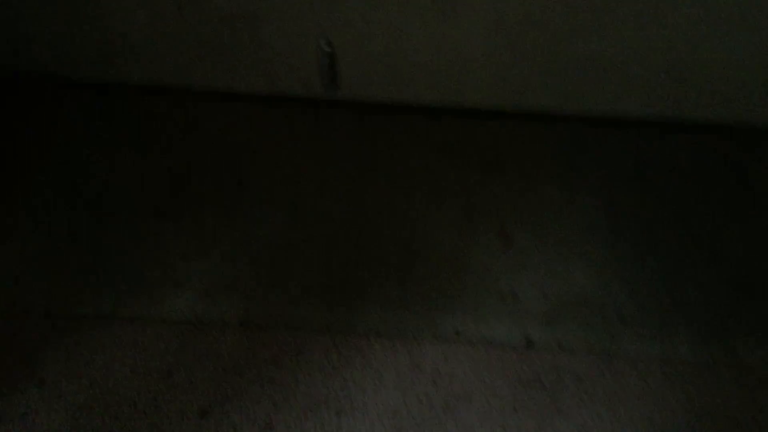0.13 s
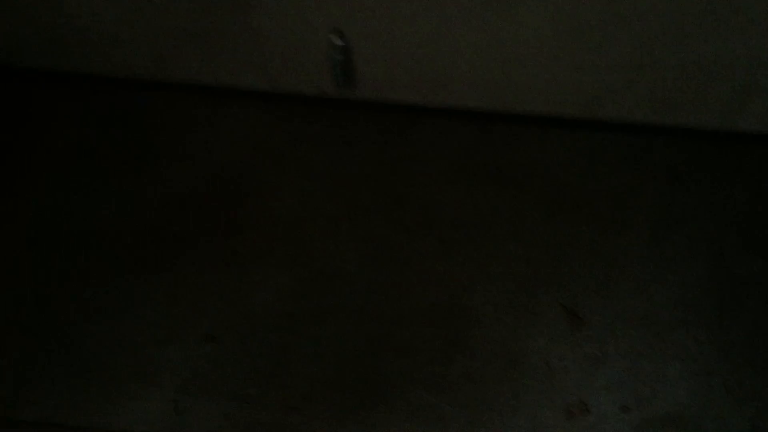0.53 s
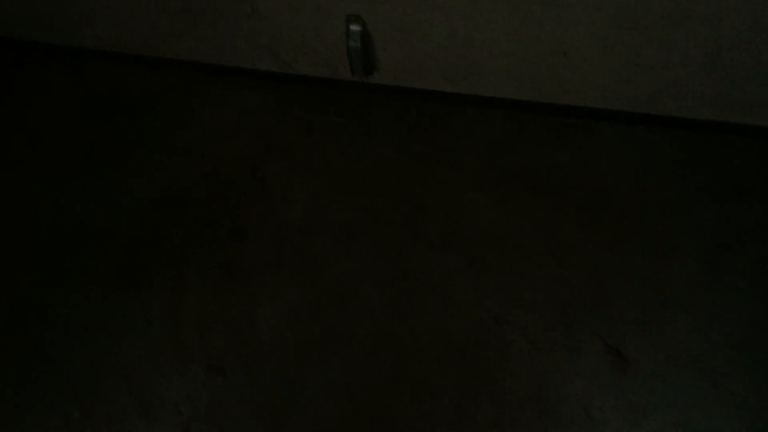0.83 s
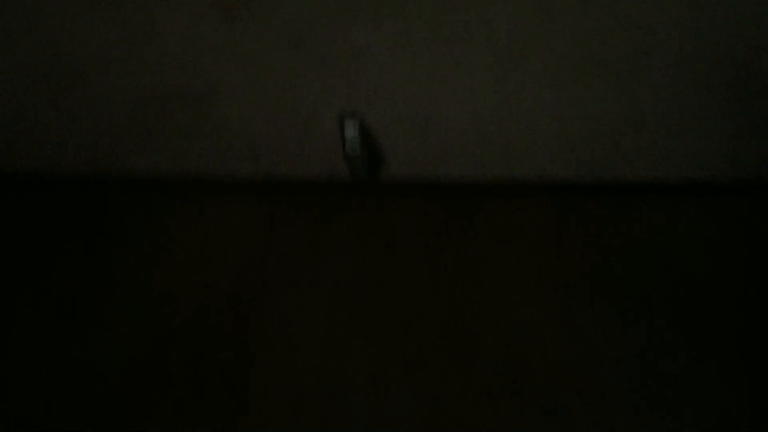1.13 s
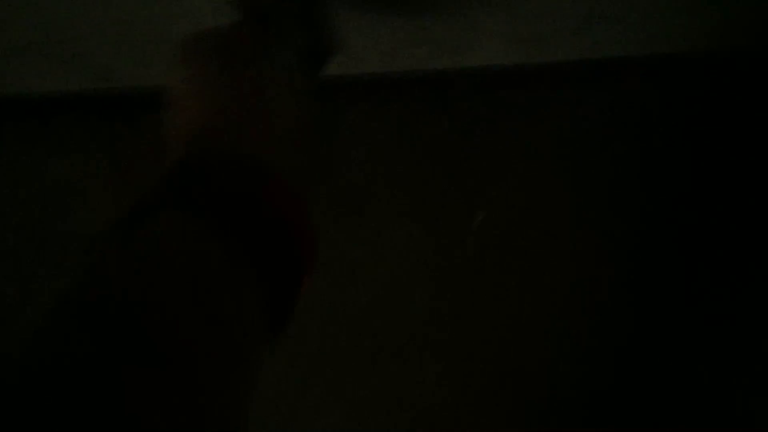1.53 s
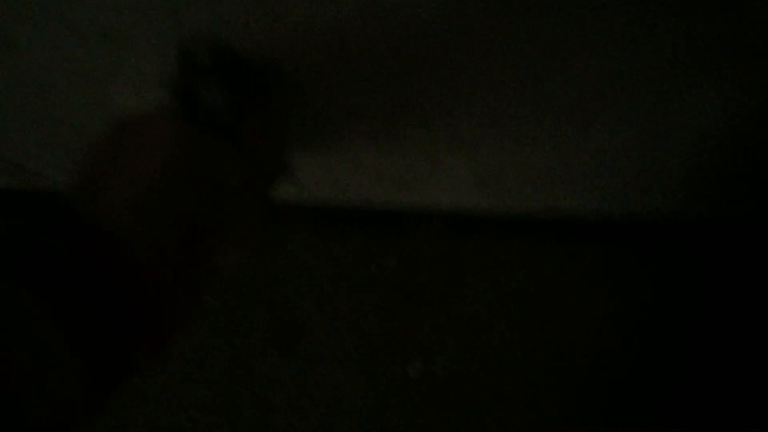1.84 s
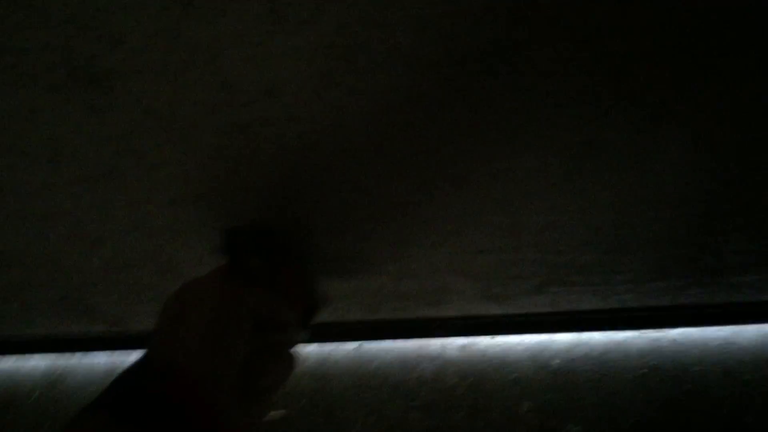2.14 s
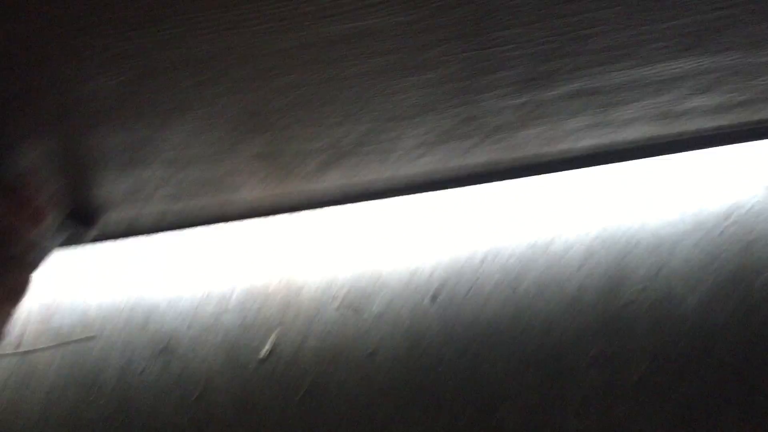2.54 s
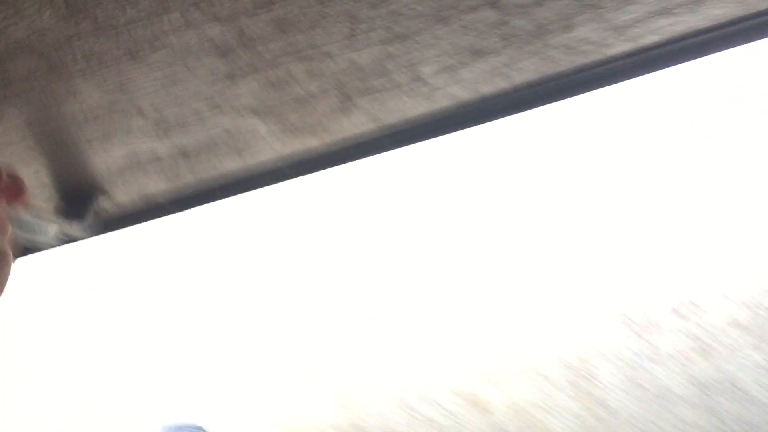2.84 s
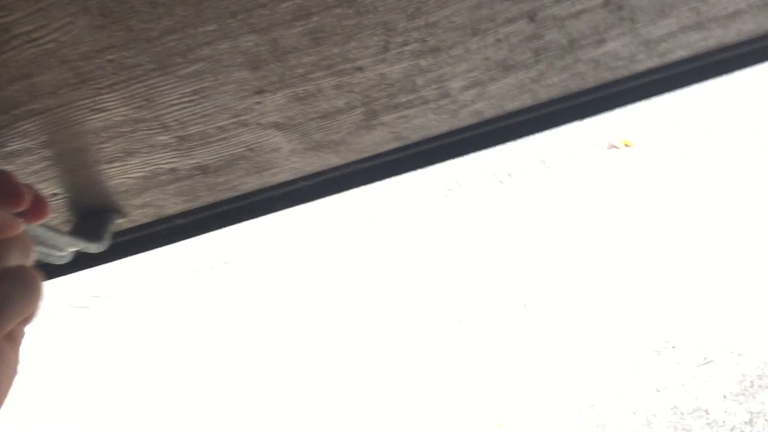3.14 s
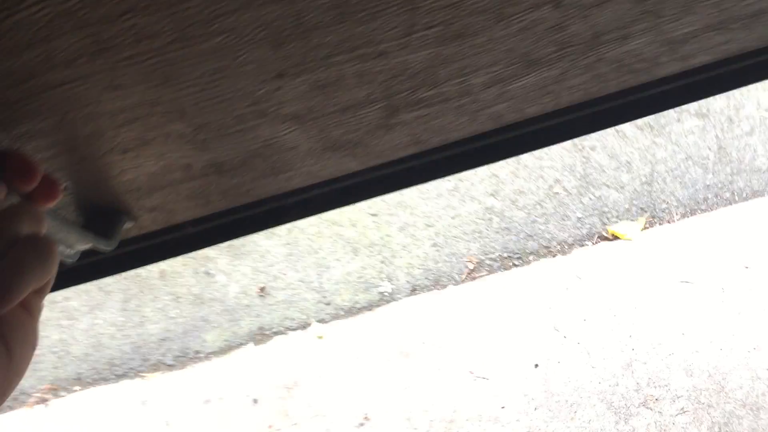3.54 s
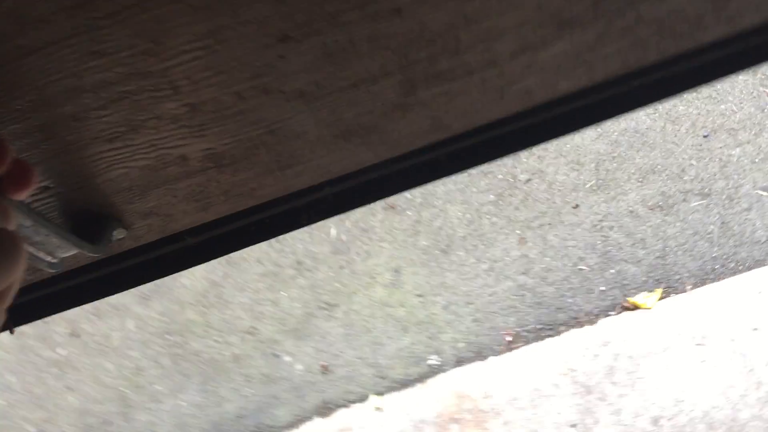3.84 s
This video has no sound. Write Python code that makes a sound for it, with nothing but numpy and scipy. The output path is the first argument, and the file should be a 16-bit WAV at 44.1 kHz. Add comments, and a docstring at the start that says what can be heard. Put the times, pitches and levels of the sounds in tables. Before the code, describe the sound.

A steel garage door is lifted by hand. After a few soft scuffing steps, the handle clicks, a roller scrapes and the door bangs free, then rumbles and rattles upward, heard close up inside a bare garage.

```python
"""Someone steps up to a steel garage door from inside, shoes scuffing on concrete, and grabs the handle.
The handle clicks and the door jolts. A dry roller scrapes and squeaks, then the door bangs free.
As it is hauled up, its rollers rumble along the tracks, loose hinges rattle and the panels boom.
The bare garage adds a short echo to the steps, knocks and rattles."""
import sys
import numpy as np
from scipy import signal
from scipy.fft import rfft, irfft, next_fast_len
from scipy.io import wavfile
from scipy.ndimage import uniform_filter1d, map_coordinates

SR = 44100
rng = np.random.default_rng(int(sys.argv[2]) if len(sys.argv) > 2 else 0)


def file_out(sig):
    """Save sig as 16-bit WAV at sys.argv[1]."""
    # one column per channel
    cols = np.atleast_2d(sig).T
    # limit, then scale
    lim = np.clip(cols, -1, 1)
    pcm = np.round(lim * 32767).astype(np.int16)
    wavfile.write(sys.argv[1], SR, pcm)


N = 176400
T = np.arange(N) / SR
AGE = np.arange(SR // 2) / SR  # seconds since one short sound began

# the notes at which the steel tracks and hinges ring: f/Hz, width/Hz, level/dB
TRACK_MODES = [(716, 11, -8), (967, 30, -1.5), (1783, 30, -13), (2323, 35, 0.5), (2730, 66, -5),
               (3080, 11, 2), (3440, 33, -0.5), (4150, 16, 3), (4400, 32, -11.5), (5260, 45, -8),
               (5400, 24, -4), (6300, 15, -8), (9380, 66, -20.5)]


def rollers():
    """Rollers clatter over the rough tracks; the louder they roll, the more the tracks ring."""
    # loudness of the rolling: t/s, level/dB
    loudness = [(1.0, -71.5), (1.5, -51.5), (1.9, -63.5), (2.03, -45.5), (2.2, -40), (2.38, -39.5),
                (2.58, -37.5), (2.7, -32.5), (2.78, -40.5), (2.84, -33.5), (2.9, -26), (3.1, -28.5),
                (3.3, -29.5), (3.39, -28.5), (3.5, -27.5), (3.65, -30), (3.8, -27.5), (4.0, -26.5)]
    # its tone colour: f/Hz, level/dB
    spectrum = [(120, -17), (250, 3.5), (340, 0.5), (430, -2.5), (580, 3.5), (1050, -0.5), (1400, -0.5),
                (2000, -3), (2500, -2.5), (3300, -10), (4800, -15.5), (6500, -19), (7700, -22.5),
                (9000, -26.5), (12000, -43), (17500, -54)]
    level_db = curve(loudness) + 0.59 * wobble(35)
    bumps = contacts(N, rate=400, spread_db=2.5)
    clatter = coloured(shimmer(sheet(bumps, t60=0.043)), spectrum)
    ringing = resonate(coloured(noise(N), spectrum), TRACK_MODES)
    ringing_db = -10 + 0.85 * (level_db - level_db.max())
    return amp(level_db) * (clatter + amp(ringing_db) * ringing)


def panels():
    """The shaken door booms at its lowest notes over a broad rumble."""
    # loudness of the boom: t/s, level/dB
    loudness = [(.08, -61), (.5, -64.5), (.8, -55), (1.03, -65.5), (1.35, -57), (1.55, -52.5),
                (1.75, -40.5), (1.83, -63), (1.93, -44.5), (2.0, -38.5), (2.2, -42.5), (2.3, -30),
                (2.45, -41.5), (2.8, -36), (2.92, -29.5), (3.28, -26.5), (3.42, -28.5), (3.65, -31.5),
                (4.0, -27)]
    # tone colour of the rumble: f/Hz, level/dB
    spectrum = [(15, -70), (27, -44), (42, -3.5), (62, 2), (90, 0.5), (125, -0.5), (190, -6.5), (250, -12),
                (400, -16.5), (880, -43)]
    # the panels' notes: f/Hz, width/Hz, level/dB
    modes = [(95.1, 3.9, 1), (193.8, 14.6, -8), (334, 22, -20)]
    level_db = curve(loudness) + 1.1 * wobble(10)
    rumble = amp(-3) * coloured(noise(N), spectrum)
    boom = amp(-2) * resonate(noise(N), modes)
    return amp(level_db) * (rumble + boom)


def rattles():
    """Loose hinges chatter in bursts and make the tracks ring."""
    # rattles: t/s, level/dB, rise/s, fade/s, treble tilt/(dB per octave), ringing offset/dB
    shakes = [(2.237, -30, 0.015, 0.22, -2, -25), (2.268, -18.5, 0.0055, 0.13, -1, -2),
              (2.296, -21, 0.0057, 0.12, -2.5, 2), (2.798, -34, 0.02, 0.19, 9, -11),
              (2.837, -21, 0.0028, 0.38, 3, 0), (2.901, -14, 0.0025, 0.088, 1.5, 12),
              (2.937, -20.5, 0.0026, 0.21, 9.5, -6), (2.976, -19, 0.0026, 0.17, -0.5, 6),
              (3.044, -19.5, 0.0055, 0.27, 0.5, -7), (3.158, -24, 0.0056, 0.32, -1, -10),
              (3.221, -25, 0.0044, 0.28, -1, -5.5), (3.29, -27.5, 0.019, 0.21, -3, 3),
              (3.333, -22, 0.0052, 0.079, 1, -2), (3.419, -27, 0.0035, 0.043, 0, 2),
              (3.451, -19, 0.0027, 0.14, -2, 3.5), (3.526, -23.5, 0.0044, 0.1, 3, 2.5),
              (3.702, -19, 0.0035, 0.19, -1, 2), (3.722, -21, 0.0054, 0.17, -0.5, -3),
              (3.79, -32.5, .003, .06, 3.5, -4), (3.922, -31.5, 0.005, 0.33, 2, -12),
              (3.98, -26.5, 0.005, .15, -0.5, -13)]
    # tone colour of a hinge: f/Hz, level/dB
    spectrum = [(100, -9), (350, -6.5), (700, -10.5), (1100, -4), (1900, 0.5), (2800, -1), (4200, -4.5),
                (6700, -10.5), (7800, -17), (9400, -15), (10500, -23.5), (12000, -19), (17000, -38.5)]
    out = np.zeros(N)
    for s, db, rise, t60, tilt_db, ring_db in shakes:
        hits = contacts(len(AGE), rate=1600, spread_db=4.5)
        chatter = coloured(shimmer(sheet(hits, t60=0.011)), spectrum, tilt_db)
        ringing = amp(ring_db - 3.5) * resonate(chatter, TRACK_MODES)
        add(out, s, amp(db) * burst(rise, t60) * unit(chatter + ringing))
    return out


def thumps():
    """Low thuds of footfalls and of the flexing door: each is a wavering tone that dies away."""
    # thuds: t/s, level/dB, f/Hz, fade/s
    thuds = [(.235, -43.5, 183.7, 0.16), (.69, -54, 210, 0.36), (.89, -46, 89.8, 1),
             (1.406, -31, 209, 0.24), (1.414, -34, 328, 0.13), (1.406, -38, 70, 0.18),
             (1.649, -17, 71.8, 0.16), (1.651, -26, 193, 0.12), (1.653, -30, 358, 0.061),
             (1.866, -30.5, 78.5, 0.14), (1.98, -23.5, 476, 0.11), (1.98, -26, 640, 0.18),
             (1.985, -26.5, 122.5, 0.2), (1.982, -28, 215, 0.14), (2.25, -24, 67.8, 0.23),
             (2.671, -5.5, 196.4, 0.043), (2.671, -11, 338, 0.034), (2.67, -18.5, 87, 0.079),
             (2.882, -6.5, 124, 0.11), (2.89, -9.5, 238, 0.038), (2.892, -12.5, 67.5, 0.13),
             (3.715, -19, 91.8, 0.39), (3.932, -24, 58.5, 0.26)]
    out = np.zeros(N)
    for s, db, hz, t60 in thuds:
        pitch = hz * (1 + 0.099 * wobble(125)[:len(AGE)])
        add(out, s, amp(db) * burst(0.0036, t60) * sine(pitch))
    return signal.sosfilt(signal.butter(2, 38, "high", fs=SR, output="sos"), out)


def bang():
    """The door comes free with one hard, brief blow of steel on steel."""
    # notes of the struck steel: f/Hz, width/Hz, level/dB
    modes = [(984, 94, -1.5), (1830, 110, 1.5), (2400, 140, -5.5), (2640, 130, -3.5), (3360, 250, -1.5),
             (5700, 1000, -15)]
    # loss of treble in the blow: f/Hz, gain/dB
    dulling = [(3600, 6.5), (4500, -10), (17000, -5)]
    shape = burst(rise=0.00016, t60=0.009, hold=0.0038)
    steel = coloured(resonate(noise(), modes), dulling)
    out = np.zeros(N)
    add(out, 2.6678, amp(-5) * shaped(steel, shape))
    return out


def scrape():
    """A dry roller sticks and slips in a dense rasp, with a thin squeak that rises and falls."""
    # loudness of the rasp: t/s, level/dB
    loudness = [(2.405, -55), (2.411, -28), (2.432, -33.5), (2.47, -35), (2.52, -26), (2.565, -31),
                (2.592, -30.5), (2.612, -57), (2.632, -35), (2.665, -43)]
    # notes that the slips set ringing: f/Hz, width/Hz, level/dB
    modes = [(300, 31, 2), (1157, 110, 1.5), (1455, 140, -2.5), (1830, 150, -3), (2320, 100, -3.5),
             (2650, 66, -3.5), (2850, 110, -5.5), (3134, 110, -2), (4610, 90, -17), (7800, 300, -26),
             (8770, 300, -25), (9900, 300, -28)]
    slip_hz = 291.5 * (1 + 0.25 * wobble(200))
    slip_count = np.floor(np.cumsum(slip_hz) / SR)
    slips = np.diff(slip_count, prepend=0) * amp(4.5 * wobble(300))  # one uneven kick per slip
    friction = unit(slips) + 0.58 * noise(N)
    out = amp(curve(loudness, outside=-np.inf)) * resonate(friction, modes)

    start, end = 2.412, 2.557  # the squeak, in seconds
    arch = np.sin(np.pi * np.minimum(AGE / (end - start), 1))
    pitch = 5480 + 170 * arch + 165 * wobble(900)[:len(AGE)]
    flutter = amp(4.2 * wobble(247)[:len(AGE)])
    shape = burst(rise=0.031, t60=0.11, hold=end - start - 0.028)
    add(out, start, amp(-42) * shape * unit(flutter * sine(pitch)))
    return out


def pings():
    """Small steel parts strike and ring, each at its own pitch."""
    # strikes: t/s, level/dB, f/Hz, fade/s
    strikes = [(1.596, -31.5, 1370, 0.05), (1.653, -34.5, 4660, 0.024), (2.668, -14, 1075, 0.021),
               (2.868, -21.5, 1036, 0.1), (3.052, -25, 2350, 0.072), (3.456, -25, 2100, .05),
               (3.706, -26, 2740, .07), (2.903, -10, 2890, 0.048), (2.904, -19, 6500, 0.059),
               (2.911, -17.5, 4900, 0.074), (2.977, -18, 3370, .09), (3.127, -42, 9300, .04),
               (3.222, -41, 11500, 0.027), (3.337, -33.5, 7900, .04), (3.338, -36, 15300, .04),
               (3.419, -35, 8800, 0.044), (3.453, -33, 13300, .06), (3.589, -39, 8400, 0.041),
               (3.642, -43, 8200, .06), (3.838, -38, 8000, .04), (3.984, -38, 13000, .05)]
    out = np.zeros(N)
    for s, db, hz, t60 in strikes:
        add(out, s, amp(db) * ring(hz, width=0.077 * hz, rise=0.00049, t60=t60))
    return out


def handle():
    """The latch and fittings click; the handle rings when knocked or rubbed."""
    # clicks: t/s, level/dB, fade/s, treble tilt/(dB per octave)
    clicks = [(1.537, -37, 0.03, 1.5), (1.597, -30, 0.026, 1.5), (1.654, -35, 0.016, 3),
              (1.674, -40, 0.031, 3.5), (1.826, -43.5, 0.022, 3), (1.928, -45.5, 0.11, 2),
              (1.9445, -32, 0.068, 0.5), (1.962, -33.5, 0.13, 5), (1.978, -21, 0.048, -4),
              (2.047, -37, 0.24, -1), (2.073, -35, 0.2, -2.5), (2.086, -24.5, 0.011, 11),
              (2.114, -34.5, 0.1, 2.5), (2.16, -35, 0.096, 1), (2.5478, -23, 0.012, 12.5),
              (2.657, -22.5, 0.14, 0.5), (2.668, -19, 0.011, 3), (2.8793, -16, 0.0058, -0.5),
              (2.884, -15.5, 0.02, 0.5), (2.8887, -12.5, 0.018, -2), (2.893, -14.5, .012, -2)]
    # tone colour of a click: f/Hz, level/dB
    spectrum = [(100, -16), (400, -8.5), (700, -1), (1500, 1), (2500, -2.5), (4400, -8), (6500, -13),
                (12000, -21.5), (17000, -36)]
    # knocks and rubs: t/s, level/dB, rise/s, fade/s, treble tilt/(dB per octave)
    taps = [(1.654, -30.5, 0.0012, 0.12, -3), (1.678, -45, .002, 0.13, 2), (1.737, -43.5, 0.017, 0.13, 1),
            (1.768, -50, .006, 0.12, 15), (1.851, -59, 0.02, 0.29, 8)]
    # the handle's notes: f/Hz, width/Hz, level/dB
    modes = [(630, 160, -13), (1060, 150, -11), (1605, 79, 1), (1750, 68, -1), (2520, 350, -15),
             (4440, 420, -11), (4660, 260, -12), (8750, 660, -30), (12400, 700, -33)]
    out = np.zeros(N)
    for s, db, t60, tilt_db in clicks:
        add(out, s, amp(db) * burst(0.00064, t60) * coloured(noise(), spectrum, tilt_db))
    for s, db, rise, t60, tilt_db in taps:
        tilted = [(hz, width, level + tilt_db * np.log2(hz)) for hz, width, level in modes]
        add(out, s, amp(db) * burst(rise, t60) * resonate(noise(), tilted))
    return out


def steps():
    """Grit grinds between sole and concrete; heels land and skid."""
    # scuffs: t/s, level/dB, rise/s, fade/s, treble tilt/(dB per octave)
    scuffs = [(.088, -59, 0.019, 0.47, 3.5), (.14, -53.5, 0.0088, 0.18, -10), (.235, -52, 0.012, 0.21, 3),
              (.551, -44, 0.0032, 0.2, 0), (.572, -41, 0.0076, 0.33, 1), (.684, -44.5, 0.0049, 0.16, -8.5),
              (.715, -50, 0.012, 0.24, -7), (.74, -58.5, 0.0065, 0.14, 9), (1.055, -38, 0.0009, 0.09, -1),
              (1.069, -35, 0.0016, 0.12, -0.5), (1.15, -44, 0.01, 0.16, 6), (1.249, -58.5, 0.038, 0.43, 3),
              (1.318, -50, 0.0071, 0.31, 0.5), (1.392, -36, 0.0027, 0.19, 2.5),
              (1.404, -21, 0.0018, 0.054, -0.3), (1.414, -16, 0.00058, 0.026, -2.5)]
    # tone colour of a scuff: f/Hz, level/dB
    spectrum = [(60, -16), (200, -2), (450, -5), (700, 0.5), (1000, 3.5), (1900, 2.5), (3500, -5.5),
                (6000, -13), (11000, -24.5), (17000, -37)]
    # heel strikes: t/s, level/dB, f/Hz, width/Hz, rise/s, fade/s
    heels = [(.553, -41, 1410, 600, 0.011, 0.23), (1.055, -45, 1240, 700, 0.0025, 0.27),
             (1.066, -39.5, 3400, 700, 0.0038, .05), (1.319, -49, 950, 400, .003, 0.19),
             (1.414, -21, 1880, 690, 0.00054, 0.042)]
    out = np.zeros(N)
    for s, db, rise, t60, tilt_db in scuffs:
        grit = contacts(len(AGE), rate=1200, spread_db=4)
        add(out, s, amp(db) * burst(rise, t60) * coloured(grit, spectrum, tilt_db))
    for s, db, hz, width, rise, t60 in heels:
        add(out, s, amp(db) * ring(hz, width, rise, t60))
    return out


def garage(x):
    """The bare room echoes x; each frequency dies away at its own speed."""
    # how long the echo lasts: f/Hz, fade/s
    fades = [(100, 0.4), (800, 0.27), (2500, 0.27), (6000, 0.39), (14000, 0.31)]
    hz, t, bands = signal.stft(noise(), SR, nperseg=256)
    decay = amp(-60 * t / along(fades, hz)[:, None])
    tail = signal.istft(bands * decay, SR, nperseg=256)[1][:len(AGE)]
    tail *= np.minimum(AGE / 0.0097, 1)
    return signal.fftconvolve(x, tail / np.linalg.norm(tail))[:N]


def air():
    """Still air gives a faint, steady hush."""
    # tone colour of the hush: f/Hz, level/dB
    spectrum = [(15, -46), (30, -28), (50, -13), (100, 1), (300, 3), (1000, -0.5), (4800, -7.5),
                (6000, -4.5), (7400, -10), (17000, -16)]
    return amp(-65) * coloured(noise(N), spectrum)


def contacts(size, rate, spread_db):
    """Tiny uneven hits, about rate a second, over an equally strong hiss of rubbing."""
    hits = (rng.random(size) < rate / SR) * rng.choice([-1, 1], size)
    strength = amp(spread_db * np.clip(noise(size), -2, 2))
    return unit(unit(hits * strength) + noise(size))


def sheet(x, t60):
    """Thin steel smears each hit into its own short, noisy ring."""
    power = signal.fftconvolve(x ** 2, burst(0.00043, t60)[:SR // 8] ** 2)[:len(x)]
    return unit(np.sqrt(np.abs(power)) * noise(len(x)))


def shimmer(x, patchy_db=3):
    """Different notes of the steel keep coming forward and fading."""
    bands = signal.stft(x, nperseg=1024)[2]
    patches = uniform_filter1d(noise(bands.shape), size=4, axis=0)  # smooth across pitch
    patches = uniform_filter1d(patches, size=5, axis=1)  # and across time
    return unit(signal.istft(bands * amp(patchy_db * unit(patches)), nperseg=1024)[1][:len(x)])


def ring(hz, width, rise, t60):
    """A struck part rings with many close notes around one pitch."""
    return shaped(resonate(noise(), [(hz, width, 0)]), burst(rise, t60))


def resonate(x, modes):
    """Make x ring at an object's own notes, its modes: f/Hz, width/Hz, level/dB."""
    def response(f):
        return sum((-1) ** k * amp(db) * 1j * f * width / (hz * hz - f * f + 1j * f * width)
                   for k, (hz, width, db) in enumerate(modes))
    return unit(filtered(x, response))


def coloured(x, spectrum, tilt_db=0):
    """Give x a tone colour; a positive tilt makes it brighter."""
    return unit(filtered(x, lambda f: amp(along(spectrum, f) + tilt_db * np.log2(1 + f / 300))))


def filtered(x, response):
    """Scale each frequency f in x by response(f)."""
    size = next_fast_len(len(x) + 8192)
    return irfft(rfft(x, size) * response(np.fft.rfftfreq(size, 1 / SR)), size)[:len(x)]


def burst(rise, t60, hold=0):
    """A loudness shape: rise, hold, then fade by 60 dB in t60 seconds."""
    return np.minimum(AGE / rise, 1) * amp(-60 * np.maximum(AGE - rise - hold, 0) / t60)


def shaped(x, shape):
    """Give x a loudness shape and the same energy as that shape."""
    sound = shape * x
    return sound * np.linalg.norm(shape) / np.linalg.norm(sound)


def sine(pitch):
    """A pure tone that follows a changing pitch in Hz."""
    return np.sin(2 * np.pi * np.cumsum(pitch) / SR)


def noise(size=len(AGE)):
    """White noise, half a second by default."""
    return rng.standard_normal(size)


def wobble(rate):
    """A smooth curve through rate random points a second."""
    return map_coordinates(noise(int(4 * rate) + 4), [T * rate], mode="nearest")


def curve(points, outside=None):
    """Join (time, value) points with straight lines."""
    return np.interp(T, *np.transpose(points), left=outside, right=outside)


def along(points, hz):
    """Read between (frequency, value) points, with octaves evenly spaced."""
    f, values = np.transpose(points)
    return np.interp(np.log(hz + 1), np.log(f + 1), values)


def add(track, s, sound):
    """Mix a sound in at s seconds."""
    part = track[max(round(s * SR), 0):][:len(sound)]
    part += sound[:len(part)]


def amp(db):
    """Turn decibels into a gain."""
    return 10 ** (np.asarray(db) / 20)


def unit(x):
    """Scale x to an average strength (rms) of 1."""
    return x / np.sqrt(np.mean(x ** 2) + 1e-20)


def scene():
    """Mix feet, handle and door with their echo, over still air."""
    feet, latch, blow, thuds = steps(), handle(), bang(), thumps()
    hinges = rattles() + pings()
    echo = garage(amp(-8.5) * feet + amp(-7.5) * latch + amp(-16) * blow
                  + amp(-14.5) * thuds + amp(-9) * hinges)
    background = echo + air()
    return (feet + latch + blow + thuds + hinges + scrape() + rollers() + panels() + background)[None]


def record(dry):
    """Fade in quickly, round off the loudest peak and cut the highest treble."""
    start_s, top_hz = 0.08, 18000
    x = dry[0] * np.clip((T - start_s) / 0.015, 0, 1)
    x = x / (1 + np.abs(x) ** 6) ** (1 / 6)
    return filtered(x, lambda f: f < top_hz)[None]


dry = scene()
out = record(dry)
file_out(out)
```